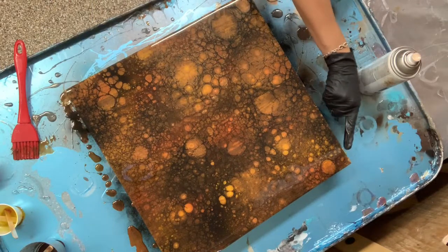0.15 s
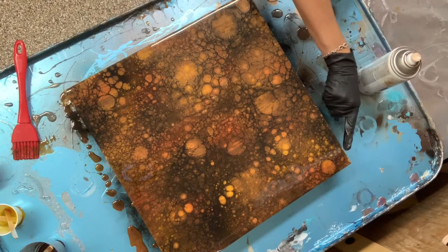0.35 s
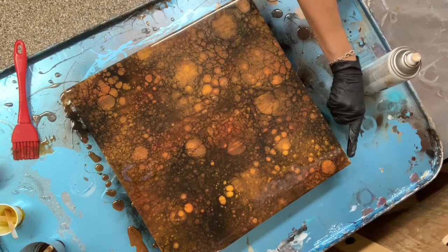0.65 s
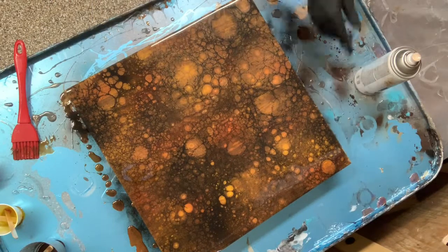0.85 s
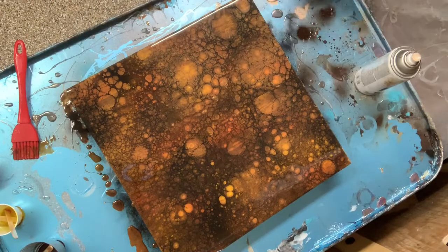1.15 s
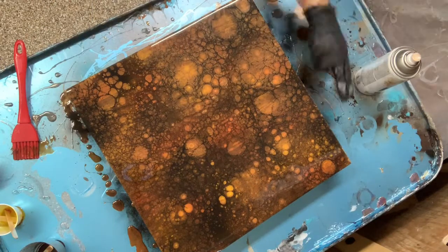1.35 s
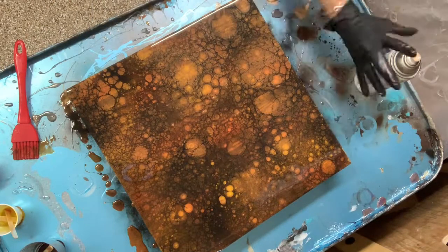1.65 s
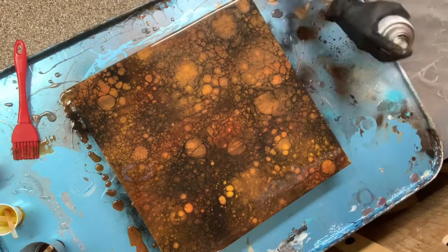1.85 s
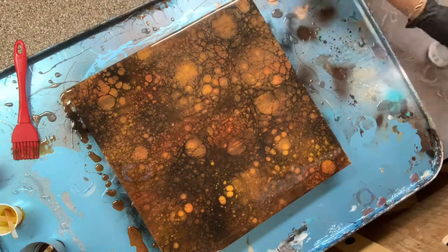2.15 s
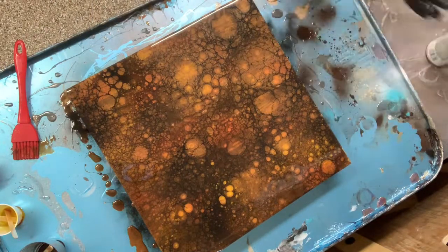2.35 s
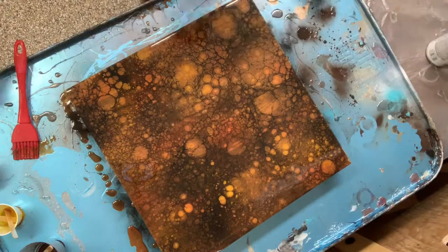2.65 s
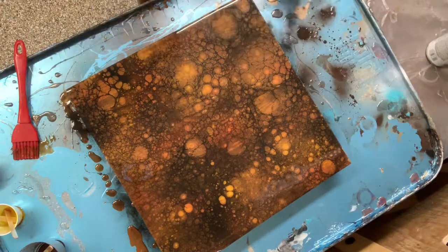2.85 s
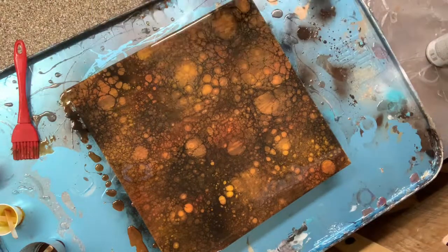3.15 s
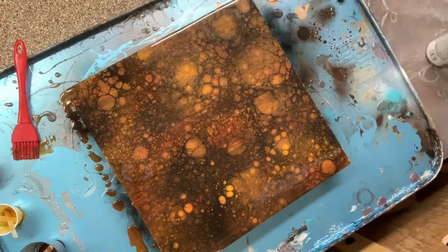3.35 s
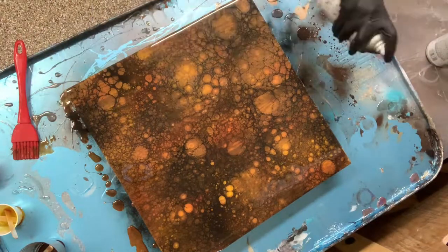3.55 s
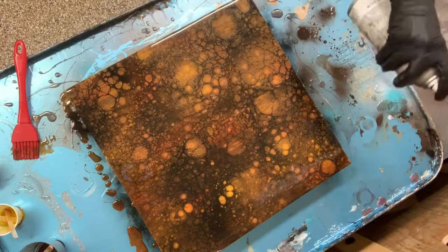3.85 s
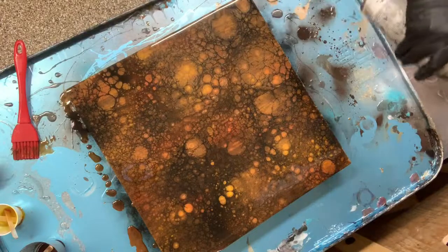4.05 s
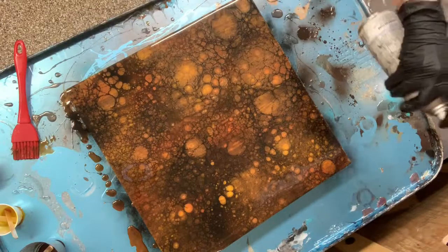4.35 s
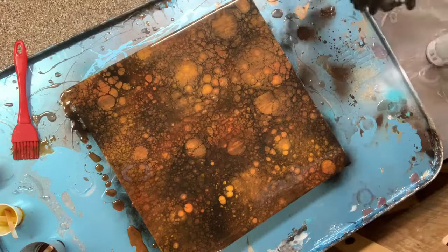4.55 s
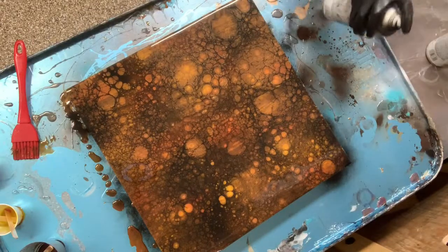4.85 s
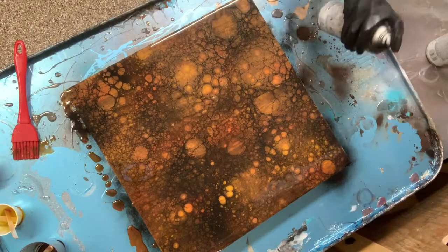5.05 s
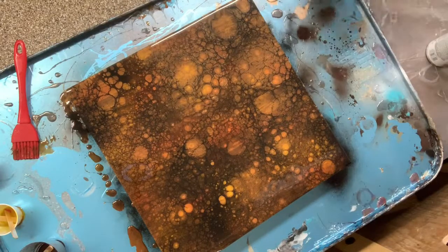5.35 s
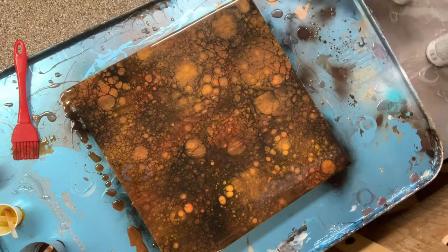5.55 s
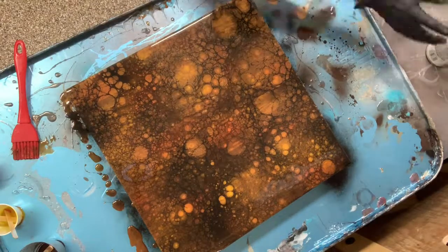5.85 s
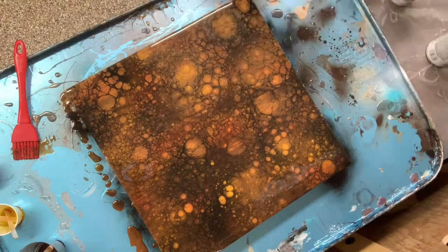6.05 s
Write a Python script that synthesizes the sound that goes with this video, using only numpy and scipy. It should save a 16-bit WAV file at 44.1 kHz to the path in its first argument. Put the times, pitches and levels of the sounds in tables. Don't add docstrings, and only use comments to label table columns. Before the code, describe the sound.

Over a low steady hum, a metal can knocks onto a table, another spits a run of short hissing sprays, then lands with a louder hollow clunk.

```python
import sys
import numpy as np
from scipy import signal
from scipy.fft import rfft, irfft, next_fast_len
from scipy.io import wavfile
from scipy.ndimage import uniform_filter1d, map_coordinates

SR = 44100
rng = np.random.default_rng(int(sys.argv[2]) if len(sys.argv) > 2 else 0)


def ratio(d):
    e = np.asarray(d, float) / 20
    return 10 ** e


def file_out(sig):
    cols = np.atleast_2d(sig).T
    lim = np.clip(cols, -1, 1)
    pcm = np.round(lim * 32767).astype(np.int16)
    wavfile.write(sys.argv[1], SR, pcm)


N = 273861
T = np.arange(N) / SR
SLOW = T[::32]

# [start_s, ring_db, rim_click_db, thud_db, thud_t60_s]
KNOCKS = [(1.797, -53, -58, -56.5, 0.14), (2.2602, -24, -32, -31, 0.48), (2.271, -29, -26, -45, .3),
          (2.283, -22.5, -40, -42, 0.36), (2.916, -61, -66, -53.5, 0.27), (2.935, -53, -70, -65, .3),
          (2.963, -48, -62, -53.5, 0.29), (3.225, -57.5, -60, -48, 0.19), (5.626, -23, -39.5, -29.5, 0.18),
          (5.6352, -23, -9, -30.5, 0.21), (5.659, -15.5, -41, -34.5, 0.57), (5.768, -41.5, -72, -57, .1),
          (5.828, -46, -64, -58, 0.23), (5.89, -40.5, -71, -63, 0.21)]
# [mode_hz, level_db, t60_s]
LIFT_MODES = [(567, -5.5, 0.064), (730, -5, .06), (987, 6, 0.07), (1100, -7, 0.05), (1486, -9, .08),
              (1640, -6, .08)]
# [mode_hz, level_db, t60_s]
RIM_A_MODES = [(137.4, -19, 0.2), (273, -11, 0.16), (368, -12, 0.074), (446, -11.5, .08), (760, -9, 0.07),
               (842, -7.5, 0.064), (908, -14, .1)]
# [mode_hz, level_db, t60_s]
EDGE_A_MODES = [(366, -7, 0.036), (592, 0, 0.052), (790, -9, 0.13), (937, -10, 0.065), (1060, -13, .08)]
# [mode_hz, level_db, t60_s]
BASE_A_MODES = [(270, -17, 0.24), (307, -30, 0.21), (409, -17, 0.35), (486, -9.5, 0.29), (600, -16, 0.3),
                (782, -13, 0.29), (854, -19.5, 0.31), (943, -23, 0.3), (983, -26, 0.2)]
# [mode_hz, level_db, t60_s]
TOUCH_MODES = [(980, -2, 0.087)]
# [mode_hz, level_db, t60_s]
TILT_MODES = [(192, 8, 0.11), (311, -1, 0.13), (442, -0.5, 0.19), (500, -4, 0.12)]
# [mode_hz, level_db, t60_s]
CAP_MODES = [(1034, 2.5, 0.06), (1810, 1, 0.074), (2230, 3.5, 0.085)]
# [mode_hz, level_db, t60_s]
RIM_B_MODES = [(282, -3.5, 0.083), (378, -0.5, 0.091), (620, -2, 0.11), (720, -2.5, 0.11),
               (1069, -4, 0.072), (1190, -15, 0.098)]
# [mode_hz, level_db, t60_s]
EDGE_B_MODES = [(278, -5, 0.12), (372, -6, 0.064), (602, 4, 0.07), (782, -5, 0.069), (830, -0.5, .045),
                (938, 3.5, 0.04), (1026, 3, 0.052), (1140, -7, .1), (1230, -13.5, .15), (1416, -16.5, 0.16)]
# [mode_hz, level_db, t60_s]
BASE_B_MODES = [(184, -17, 0.24), (284, -20, 0.28), (376, -18.5, 0.34), (452, -16, 0.49),
                (505, -11.5, 0.26), (617, -11, 0.33), (718, -14, 0.3), (797, -14.5, 0.27),
                (894, -16.5, 0.18), (1020, -19, .2), (1075, -18.5, 0.24), (1175, -24, 0.15),
                (1257, -24, .2), (1370, -24, 0.24)]
# [mode_hz, level_db, t60_s]
ROCK_MODES = [(181, 8.3, 0.071)]
# [mode_hz, level_db, t60_s]
SETTLE_MODES = [(184, 12, 0.15), (449, 8.5, 0.2), (527, 1.9, 0.37)]
# [mode_hz, level_db, t60_s]
REST_MODES = [(173.7, 2.5, 0.18), (451, -7.5, 0.2)]
KNOCK_MODES = [LIFT_MODES, RIM_A_MODES, EDGE_A_MODES, BASE_A_MODES, TOUCH_MODES, TILT_MODES, TILT_MODES,
               CAP_MODES, RIM_B_MODES, EDGE_B_MODES, BASE_B_MODES, ROCK_MODES, SETTLE_MODES, REST_MODES]
# [start_s, mode_hz, level_db, held_s, t60_s]
BODY = [(2.2605, 543, -25.5, 0.037, 0.14), (2.266, 172, -28.5, 0.017, 0.086), (2.245, 207, -38, 0.017, .1),
        (2.258, 790, -36, 0.011, .1), (2.266, 620, -34, 0.0063, 0.071), (2.262, 375, -40, 0.011, .1),
        (2.33, 181, -33.5, 0.017, 0.097), (2.33, 612, -37, 0.011, 0.08), (2.355, 548, -35, 0.011, 0.2),
        (5.6355, 542, -15.5, 0.038, 0.16), (5.632, 179, -20.5, 0.013, 0.06), (5.6, 1150, -41.5, .012, .1),
        (5.598, 800, -39, .015, .1), (5.715, 175, -40, .01, .1), (5.668, 87, -39.5, .006, .08),
        (5.835, 183, -38, 0.011, 0.087), (5.68, 185, -34.5, .01, 0.11), (5.648, 270, -29, .015, .07),
        (5.66, 1010, -35, .01, .1), (5.79, 480, -39, 0.0074, 0.046), (5.6243, 450, -19.5, .016, .1),
        (5.73, 540, -28.5, 0.0046, 0.14)]
# [start_s, level_db, pitch_hz,
# t60_s, spread_hz]
TICKS = [(1.185, -77, 5640, .1, 1200), (1.46, -81, 5430, .15, 600), (1.6, -75, 2040, .5, 60),
         (1.65, -78, 5370, 0.2, 403), (1.792, -76, 6160, .06, 403), (1.803, -59, 12700, 0.083, 895),
         (1.86, -66, 8300, 0.081, 710), (1.968, -62, 6750, 0.11, 1620), (2.09, -72, 8900, 0.12, 600),
         (2.268, -49, 4400, 0.21, 920), (2.272, -56, 2230, 0.1, 202), (2.54, -74, 7850, 0.082, 1100),
         (2.622, -65.5, 1340, 0.32, 504), (2.665, -76, 7900, 0.083, 894), (2.92, -71, 8800, 0.11, 1200),
         (3.06, -78, 8000, .1, 900), (3.262, -50, 4400, 0.25, 350), (3.28, -46, 6480, 0.24, 410),
         (3.419, -41.5, 4460, 0.063, 299), (3.46, -45, 4490, .1, 300), (3.585, -51, 2850, 0.23, 121),
         (3.8, -50.5, 4400, 0.32, 251), (4.041, -49, 2465, 0.23, 403), (4.29, -47.5, 2396, .2, 504),
         (5.64, -43, 2134, 0.3, 393), (5.861, -56.5, 1564, 0.22, 499)]
# [freq_hz, density_db]
TABLE_THUD = [(70, -33), (110, -4), (180, 0.5), (350, 1), (600, -3.5), (900, -14), (1200, -29), (1700, -31),
              (2500, -80)]

# [start_s, hiss_db, held_s, fall_db_per_s, whistle_db]
PUFFS = [(3.224, -50.5, 0.007, 429, 5.5), (3.262, -52, 0.001, 94, -15), (3.399, -41.5, 0.0062, 331, 3),
         (3.447, -46, 0.0031, 174, 10), (3.59, -49, 0.025, 378, 4.5), (3.75, -46, 0.056, 273, -7),
         (3.991, -45, 0.051, 261.5, -10), (4.252, -45, 0.049, 337, -3), (4.448, -45, 0.049, 339, -2),
         (4.756, -46, 0.058, 431, 1), (4.958, -44.5, 0.038, 383, -2), (5.155, -45.5, 0.045, 461, -3)]
# [thin_top_db, paint_db]
PUFF_BALANCE = [(2, -0.5), (-10, 1), (-4, 1), (-1, 0.5), (0, 0.5), (0.5, -2), (1, 0.5), (1.5, 1.5),
                (1.5, -0.5), (2, -2), (-1.5, -0.5), (-1.5, 0.5)]
# [freq_hz, density_db]
JET = [(4500, -10.5), (6500, -0.5), (8500, 1), (10500, 4.5), (12000, 1), (13200, -5), (15800, -27)]
# [freq_hz, density_db]
FIZZ = [(8500, -46), (11000, -25), (12500, 4), (14000, 7), (14700, 3), (15200, 10), (15600, -3.5),
        (16000, -1.5)]
# [freq_hz, density_db]
MIST = [(350, -37), (700, -6.5), (1200, -3), (2500, 1), (3400, 0), (4500, 0), (6000, -7), (8000, -3),
        (10000, -56)]
# [centre_hz, width_hz, level_db]
NOZZLE = [(2640, 210, -1.5), (3815, 85, -6), (4400, 560, -2.5), (6480, 490, 3), (8300, 460, -4),
          (9300, 320, -3), (10490, 460, 1.5), (12500, 400, -10)]
# [freq_hz, lost_share]
GAPS = [(1500, 0), (2100, .07), (5400, .07), (6000, .03), (7300, .05), (8000, 0)]

# [freq_hz, density_db]
RUB = [(1200, -10), (1900, -2), (3000, -4), (4300, -4), (6000, -12), (8000, -36.5), (9500, -57)]
# [freq_hz, density_db]
DULL = [(400, -24.5), (750, -3.5), (1050, -1.5), (1500, -12), (1900, -21.5), (3000, -52)]
# [freq_hz, density_db]
CRISP = [(4500, -31), (6500, -4.5), (8500, -8), (12000, -12), (15800, -22.5)]
# [start_s, held_s, rub_db]
RESTLESS = [
    (.87, 0.73, -80.5),
    (1.75, 1.3, -93),
    (5.412, 0.23, -71),
    (5.95, 0.34, -94),
]
# [peak_s, rub_db, rise_db_per_s, dull_db,
# crisp_db]
SWEEPS = [(.89, -80, 150, 4, -4), (1.04, -78, 116, 0, -7), (1.19, -68, 300, -6, -11),
          (1.29, -72.5, 260, 2, -11), (1.465, -84, 250, -7, -5), (1.67, -71, 54, -4, -18),
          (1.97, -73, 210, -2, 3.5), (2.11, -70.5, 137, -9, -5), (2.63, -77.5, 146, 8, -6),
          (2.73, -65.5, 180, -5, -14), (2.81, -63, 83, -2.5, -22), (2.92, -82.5, 200, 14, 7.5),
          (2.98, -69, 130, -4, -8), (3.19, -71.5, 72, 1, -8), (4.593, -54.5, 217, -13, -8),
          (5.857, -55.5, 172, -15, -11.5), (6.138, -72.5, 85, -1.5, -4.5)]
# [peak_s, rub_db, fall_db_per_s, dull_db, crisp_db]
GRIPS = [(1.798, -56.5, 400, 5, -2), (2.245, -63.5, 200, 4, 1), (1.807, -52, 238, -2, -5.5),
         (2.268, -50.5, 600, -10, -1), (2.28, -56.5, 146, 5, -9.5), (5.595, -63, 75, 16.5, -13),
         (5.631, -39.5, 304, 16.5, -11), (5.69, -57.5, 197.5, 21, -15), (5.75, -72.5, 73, -3, -13),
         (6.208, -78, 503, 2, -5)]

# [freq_hz, density_db]
ROOM = [(15, -64), (25, -23), (42, -22), (64, -20), (86, -19.5), (116, -25), (140, -29), (174, -21),
        (210, -27.5), (241, -24), (324, -36), (361, -30), (540, -37), (2580, -62), (13500, -72.5),
        (15700, -85)]
# [centre_hz, width_hz, level_db]
DUCT = [(113, 17, -61), (176.8, 16, -61), (235.7, 16, -65.5), (286.5, 18.2, -60.5), (358.3, 8.8, -63),
        (404, 5.4, -71), (2070, 130, -83), (3720, 180, -86.5), (4460, 110, -90)]
# [start_s, held_s, level_db]
DRONE = [
    (1.55, 0.49, -55),
    (5.14, 0.042, -61),
]

# [freq_hz, correlation]
ALIKE = [(60, 1), (140, 0.91), (330, 0.83), (700, 0.25), (1300, 0.53), (2000, -0.12), (2950, -0.1),
         (3450, 0.43), (4250, 0.36), (4800, -0.1), (5900, 0.8), (6500, 0.5), (7200, 0.64), (8200, 0.99),
         (15000, 0.99)]
# [freq_hz, difference_db]
LEAN = [(300, -.5), (1200, -2), (2600, -1.5), (3500, -0.5), (15000, 0)]


def unit(x):
    return x / np.sqrt(np.mean(x ** 2) + 1e-20)


def along(points, hz):
    f, v = np.transpose(points)
    return np.interp(np.log(hz + 1), np.log(f + 1), v)


def wobble(rate_hz, t=T):
    knots = rng.standard_normal(int((t[-1] - t[0]) * rate_hz) + 4)
    return map_coordinates(knots, [(t - t[0]) * rate_hz])


def filtered(x, response):
    m = next_fast_len(N + 8192)
    return irfft(rfft(x, m) * response(np.fft.rfftfreq(m, 1 / SR)), m)[..., :N]


def peaks(modes):
    def gain(f):
        total = 0
        for centre_hz, width_hz, db in modes:
            damping = (f * width_hz) ** 2
            total = total + ratio(db) * damping / ((centre_hz ** 2 - f * f) ** 2 + damping) / np.sqrt(width_hz)
        return total
    return gain


def air(colour, patchy_db):
    z = signal.stft(rng.standard_normal((2, N)), nperseg=512)[2]
    field = uniform_filter1d(rng.standard_normal(z.shape[1:]), size=5, axis=0)
    field = uniform_filter1d(field, size=6, axis=1)
    pair = signal.istft(z * ratio(patchy_db * unit(field)), nperseg=512)[1][:, :N]
    gain = colour if callable(colour) else lambda hz: ratio(along(colour, hz))
    return unit(filtered(pair, gain))


def swell(start_s, held_s, rise, fall):
    before = (start_s - SLOW) * rise
    after = (SLOW - start_s - held_s) * fall
    return -np.maximum(0, np.maximum(before, after))


def level(power):
    return np.interp(T, SLOW, np.sqrt(power))


def add(out, start_s, hz, db, t60_s, rise, held_s, waver_hz, waver_db, turns):
    near = slice(round((start_s - .1) * SR), round((start_s + .3) * SR))
    t = T[near] - start_s
    drop_db = np.maximum(0, np.maximum(-t * rise, 60 * (t - held_s) / t60_s))
    shape = ratio(db - drop_db + waver_db * wobble(waver_hz, t))
    phase = 0.15 * rng.normal() - np.array([[1 / 4], [0]]) + turns * wobble(waver_hz, t)
    phase = phase + [[0], [.3]] * wobble(25, t[::8]).repeat(8)[:len(t)]
    out[:, near] += shape * np.sin(2 * np.pi * (hz * t + phase)) * [[1], [.45]]


def notched(pair):
    from_s, full_s, gap_db = 3.6, 4.7, -35
    hz, t, z = signal.stft(pair, SR, nperseg=2048)
    cells = rng.random((len(hz) // 6 + 1, len(t) // 2 + 1))
    cells = cells.repeat(6, axis=0).repeat(2, axis=1)[:len(hz), :len(t)]
    share = along(GAPS, hz)[:, None] * np.clip((t - from_s) / (full_s - from_s), 0, 1)
    return signal.istft(z * ratio(gap_db * (cells < share)), nperseg=2048)[1][:, :N]


def knocks():
    swell_rise = 1020
    out, thud = np.zeros((2, N)), np.zeros(len(SLOW))
    t = np.arange(-200, 200) / SR
    click = np.exp(-(t / 0.00062) ** 2) * np.cos(2 * np.pi * 800 * t)
    for (s, ring_db, click_db, thud_db, thud_t60_s), modes in zip(KNOCKS, KNOCK_MODES):
        for hz, mode_db, t60_s in modes:
            add(out, s, hz, ring_db + mode_db, t60_s, swell_rise,
                held_s=0.0036, waver_hz=45.2, waver_db=1.85, turns=0.078)
        out[0, round((s + t[0]) * SR):][:len(t)] -= ratio(click_db) * click
        thud += ratio(thud_db + swell(s, 0.0092, swell_rise, 60 / thud_t60_s)) ** 2
    for s, hz, db, held_s, t60_s in BODY:
        add(out, s, hz, db, t60_s, 950, held_s, waver_hz=34.6, waver_db=1.2, turns=0.037)
    for s, db, hz, t60_s, spread_hz in TICKS:
        add(out, s, hz, db, t60_s, 650, held_s=0.0062, waver_hz=spread_hz, waver_db=3.0, turns=0.32)
    return out + level(thud) * air(TABLE_THUD, patchy_db=3.5)


def spray():
    wet_db, dries_db_per_s = -0.4, 5
    jet, fizz, mist, whistle = np.zeros((4, len(SLOW)))
    for (s, db, held_s, fall, whistle_db), (top_db, paint_db) in zip(PUFFS, PUFF_BALANCE):
        body_db = wet_db - dries_db_per_s * (s - PUFFS[0][0])
        jet += ratio(db - 0.5 + swell(s, held_s, 960, fall)) ** 2
        fizz_db = db - 5 + top_db - 0.46 * body_db
        fizz += ratio(fizz_db + swell(s, held_s * 0.97, 780, fall * 1.3)) ** 2
        mist += ratio(db + body_db + paint_db + swell(s + 0.0074, held_s * 0.96, 600, fall * 0.6)) ** 2
        mist += ratio(db + body_db - 18.0 + swell(s + 0.04, held_s + 0.023, 400, fall * 1.2)) ** 2
        whistle += ratio(db + whistle_db - 5.5 + swell(s + 0.004, held_s, 1000, fall * 0.9)) ** 2
    total = level(jet) * air(JET, patchy_db=1.3)
    total += level(fizz) * air(FIZZ, patchy_db=1.3)
    total += level(mist) * air(MIST, patchy_db=2)
    total += level(whistle) * air(peaks(NOZZLE), patchy_db=2.5)
    return ratio(0.43 * wobble(45)) * notched(total)


def hand():
    restless_edge, grip_rise = 130, 970
    fall_over_rise = 1.36
    moves = []
    for s, held_s, db in RESTLESS:
        moves.append((db + swell(s, held_s, restless_edge, restless_edge), -3.5, -13))
    for s, db, rise, dull_db, crisp_db in SWEEPS:
        moves.append((db + swell(s, 0, rise, rise * fall_over_rise), dull_db, crisp_db))
    for s, db, fall, dull_db, crisp_db in GRIPS:
        moves.append((db + swell(s, 0, grip_rise, fall), dull_db, crisp_db))
    powers = np.zeros((3, len(SLOW)))
    for rub_db, dull_db, crisp_db in moves:
        powers += ratio(rub_db + np.array([[0], [dull_db], [crisp_db]])) ** 2
    return sum(level(power) * air(colour, patchy_db=2.0) for power, colour in zip(powers, (RUB, DULL, CRISP)))


def cleaner():
    motor_hz, motor_start_s = 58.68, .0003
    beat_hz, beat_top_s = 5.11, .35
    beat = np.exp(2j * np.pi * beat_hz * (T - beat_top_s))
    tone = np.exp(2j * np.pi * motor_hz * (T - motor_start_s))
    tone = tone * (1 + ratio(-18.5) / beat + ratio(-26.5) * beat)
    hum = ratio(-38.5 + 0.28 * wobble(0.37)) * tone.real
    far = level(sum(ratio(db + swell(s, held_s, 300, 290)) ** 2 for s, held_s, db in DRONE))
    drone = far * ratio(1.9 * wobble(4.86)) * np.sin(2 * np.pi * (287 * T + 1.84 * wobble(1.9)))
    duct = ratio(-58) * air(peaks(DUCT), patchy_db=1.55)
    room = ratio(-55.5) * air(ROOM, patchy_db=2.1)
    return (hum + drone) * [[1], [.04]] + duct + room


def scene():
    split_hz, turn_hz = 5805, 2445

    def ports(hz):
        turn = np.arccos(np.clip(along(ALIKE, hz), -1, 1)) / 2
        lag = np.exp(1j * np.pi * np.maximum(hz - split_hz, 0) / turn_hz) * ratio(along(LEAN, hz) / 2)
        left = [np.cos(turn) * lag, np.sin(turn) * lag]
        right = [np.cos(turn) / lag, -np.sin(turn) / lag]
        return np.array([left, right])

    parts = knocks() + spray() + hand() + cleaner()
    return filtered(parts[None], ports).sum(axis=1)


def band_limit(x):
    return signal.sosfilt(signal.butter(12, 15910, fs=SR, output="sos"), x)


def record(dry):
    top_hz, slope_hz = 15870, 120
    mix = filtered(dry, lambda hz: np.clip((top_hz - hz) / slope_hz, 0, 1))
    return band_limit(mix)


dry = scene()
out = record(dry)
file_out(out)
```